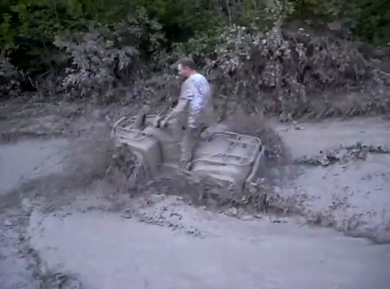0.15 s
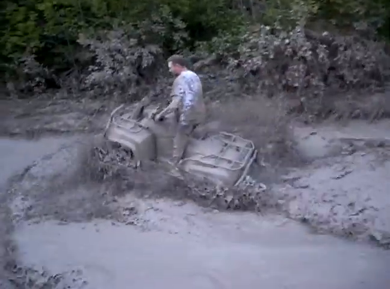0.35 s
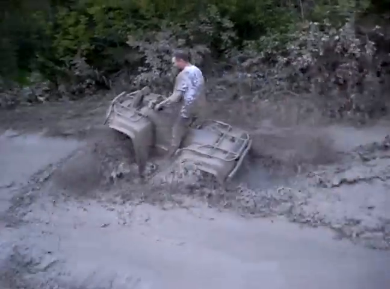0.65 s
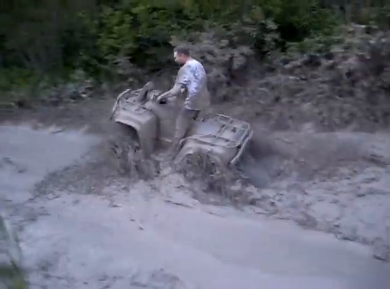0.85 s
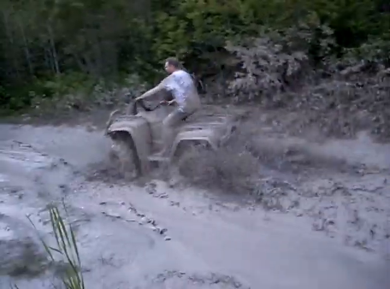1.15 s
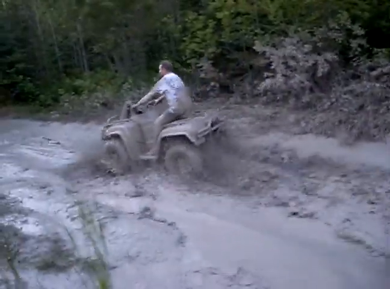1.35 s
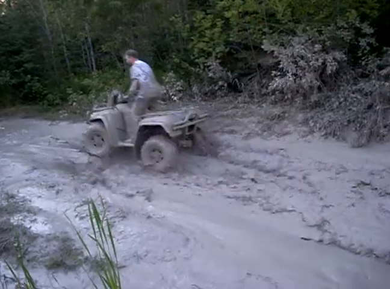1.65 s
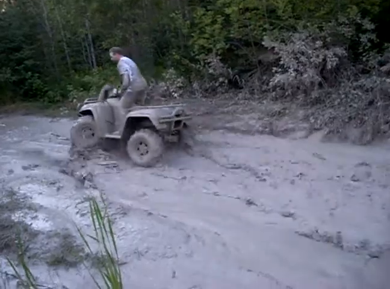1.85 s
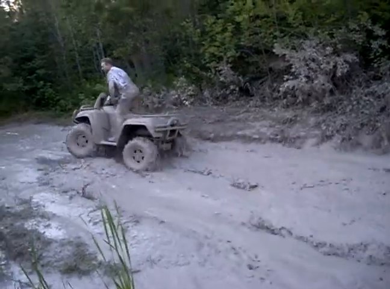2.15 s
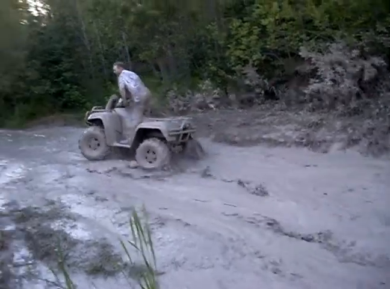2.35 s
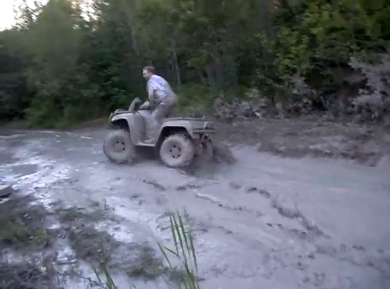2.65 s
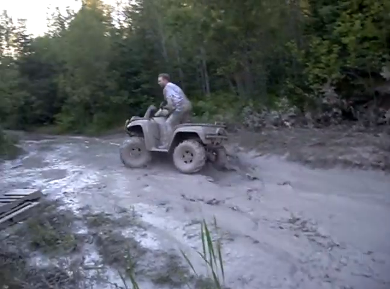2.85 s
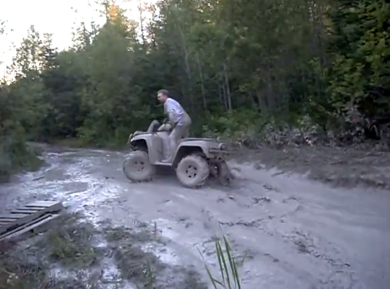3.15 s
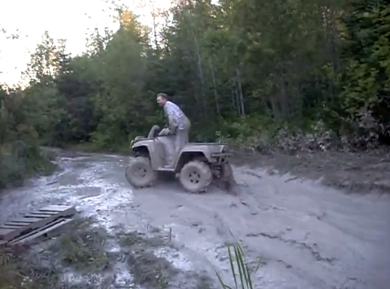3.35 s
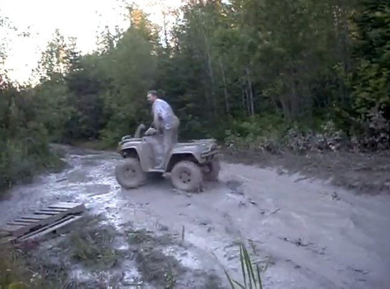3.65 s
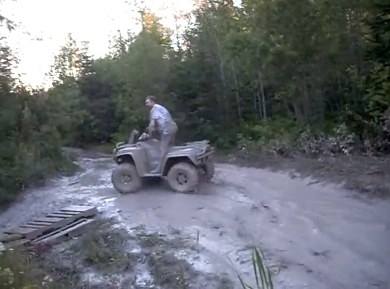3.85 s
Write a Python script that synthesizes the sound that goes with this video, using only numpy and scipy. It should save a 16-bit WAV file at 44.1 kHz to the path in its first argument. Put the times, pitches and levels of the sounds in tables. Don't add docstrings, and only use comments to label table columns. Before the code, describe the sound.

A loud raspy quad engine churns wet mud, cuts back abruptly, then putters and blips twice.

```python
import sys
import numpy as np
from scipy import signal
from scipy.io import wavfile
from scipy.ndimage import uniform_filter1d

SR = 44100
rng = np.random.default_rng(int(sys.argv[2]) if len(sys.argv) > 2 else 0)


def attenuation_scalar(level_db):
    decades = np.asarray(level_db, float) / 20
    return 10 ** decades


def transcribe(u):
    v = np.clip(np.atleast_2d(u).T, -1, 1)
    q = np.round(v * 32767).astype(np.int16)
    wavfile.write(sys.argv[1], SR, q)


N = 176400

# (time [s], firing rate [Hz])
ENGINE_SPEED = [(0.0, 48.2), (0.15, 48.85), (0.4, 45.15), (0.6, 47.2), (0.87, 49.05), (0.94, 42.5),
                (1.04, 35), (1.22, 25), (1.8, 18.5), (1.93, 19.5), (2.1, 27.6), (2.29, 32.3), (2.6, 30.3),
                (2.84, 22), (3.2, 23.5), (3.64, 30.9), (3.76, 30), (4.0, 23.3)]
# (time [s], pipe hum [dB], exhaust blast [dB])
ENGINE_LOAD = [(0, -28, -20.5), (.18, -29.5, -19), (.33, -28, -23), (.49, -27.5, -25.5), (.57, -28, -18),
               (.86, -32, -17.5), (.91, -41, -44), (1.08, -36, -39), (1.3, -50.5, -39.5), (1.8, -62, -46.5),
               (1.95, -43, -44), (2.25, -37, -42.5), (2.6, -42, -53), (2.87, -51.5, -58), (3.1, -48.5, -56),
               (3.3, -40, -43.5), (3.72, -41, -47.5), (3.85, -48, -89)]
# (frequency [Hz], level [dB])
PIPE_IN_SLURRY = [(48, -38), (95, -12.5), (145, -11.5), (190, -14.5), (240, -15.5), (285, -15.5),
                  (330, -20), (600, -27.5)]
PIPE_CLEAR = [(30, -36), (70, -19), (117, -4), (165, -17), (200, -4), (224, 2), (256, -2), (290, -9),
              (330, -22), (600, -34)]
# (time [s], resonance [Hz])
AIR_POCKET = [(0, 152), (.17, 160), (.26, 187), (.5, 184), (.56, 236), (.86, 243), (.9, 168), (1.0, 150),
              (1.05, 100), (1.3, 72)]
# (phase [turn], level [dB])
GAS_PUFFS = [(.14, 1), (.3, -6), (.43, 0), (.59, -2), (.77, -9)]
# (frequency [Hz], density [dB per Hz])
BLAST_COLOUR = [(240, -11), (400, -12.5), (677, -5), (1210, -37), (1520, -3), (3740, -3.5), (5810, -2.5),
                (10300, -5.5), (12000, 10), (15600, -49), (22000, -120)]
# (frequency [Hz], width [Hz], level [dB])
MUFFLER_TIN = [(1650, 260, -8), (2570, 200, 0.5), (3320, 490, -3), (4500, 340, -2), (5220, 200, -3),
               (5960, 250, -5.5)]
# (frequency [Hz], width [Hz], level [dB])
CRACK_TIN = [(1670, 230, -17), (2450, 160, -2), (3330, 130, -10)]
# (frequency [Hz], width [Hz], level [dB])
WET_RASP = [(652, 78, 7), (933, 110, -2.5)]
DRY_RASP = [(790, 90, -3), (890, 100, 0)]
HOT_RASP = [(800, 90, -4), (970, 110, 0)]
# (time [s], level [dB])
MUD_LEVEL = [(0, -27.5), (.5, -27), (.85, -26.5), (1.0, -29.5), (1.6, -32.5), (1.8, -36), (2.3, -33.5),
             (2.9, -38), (3.5, -39), (4, -41.5)]
# (frequency [Hz], density [dB per Hz])
WASH_COLOUR = [(25, -25), (110, -2), (170, -5.5), (380, -8), (540, -7.5), (800, 0), (1500, -4), (4000, -10),
               (11000, -18.5)]
# (time [s], firing rate [Hz])
FAR_SPEED = [(0, 18.7), (3.0, 18.7), (3.3, 19.5), (4, 19.6)]
# (frequency [Hz], width [Hz], level [dB])
FAR_PIPE = [(103.6, 19, 18), (203, 21, -3)]
# (time [s], turning rate [Hz], level [dB])
BELT = [(0, 30, -80), (.74, 30, -70), (.8, 35, -42), (.9, 43, -38), (.97, 41, -38), (1.02, 37, -70),
        (4, 37, -90)]
# (multiple of turning rate, level [dB])
BELT_ORDERS = [(2, -8), (3, -1), (4, 1.5), (5, -2)]
# (time [s], peak [dB])
SHARP_POPS = [(1.7382, -23), (1.7707, -22), (1.85, -25), (1.9039, -24), (1.9533, -20), (1.9977, -20),
              (2.0391, -23), (2.0924, -19), (2.1284, -19), (2.1643, -18), (2.2067, -21), (2.2291, -23),
              (2.2621, -20), (2.2925, -19), (2.3553, -24), (2.4182, -25), (2.4556, -24), (2.518, -25),
              (2.6332, -24), (2.6861, -24), (2.727, -27), (2.7604, -28), (2.7918, -25), (2.8452, -26),
              (2.9545, -28), (3.0079, -27), (3.0627, -27), (3.1076, -27), (3.1944, -27), (3.2708, -27),
              (3.3082, -26), (3.3481, -25), (3.4224, -27), (3.4583, -27), (3.5287, -25), (3.5811, -27),
              (3.6289, -25), (3.6718, -28), (3.7322, -25), (3.7826, -28), (3.8335, -29), (3.8739, -30),
              (3.9323, -27), (3.9547, -27)]
# (frequency [Hz], density [dB per Hz])
POP_RUSH_COLOUR = [(500, -25), (1000, -1), (1300, -7), (2600, 1.5), (4500, -6), (8000, -9.5), (12000, -9.5)]
# (delay [s], level [dB])
REFLECTIONS = [(.031, -14), (.074, -17), (.13, -20)]


def rms_one(x):
    return x / np.sqrt(np.mean(x ** 2) + 1e-20)


def evened(x):
    return x / np.sqrt(uniform_filter1d(x ** 2, size=6000) + 1e-20)


def in_time(rows):
    s, *columns = np.transpose(rows)
    return [np.interp(np.arange(N) / SR, s, column) for column in columns]


def drift(rate_hz):
    r = np.exp(-2 * np.pi * rate_hz * 40 / SR)
    white = rng.standard_normal(N // 40 + 2002)
    slow = signal.lfilter([1], [1, -2 * r, r * r], white)[2000:]
    return np.interp(np.arange(N) / 40, np.arange(len(slow)), rms_one(slow))


def filtered(x, order, hz, kind):
    return signal.sosfilt(signal.butter(order, hz, kind, fs=SR, output="sos"), x)


def decaying(x, fall_s):
    return signal.lfilter([1], [1, -np.exp(-1 / (fall_s * SR))], x + 1e-18)


def resonate(x, peaks):
    out = 0
    for k, (hz, width, db) in enumerate(peaks):
        r = np.exp(-np.pi * width / SR)
        feedback = [1, -2 * r * np.cos(2 * np.pi * hz / SR), r * r]
        ring = signal.lfilter([(1 - r * r) / 2, 0, (r * r - 1) / 2], feedback, x + 1e-18)
        out = out + (-1) ** k * attenuation_scalar(db) * ring
    return out


def banded_noise(spectrum, patchy_db):
    out = 0
    edges = 35 * 2 ** np.arange(0, 8.7, 1 / 3)
    white = rng.standard_normal((2, N))
    hz, db = np.transpose(spectrum)
    for k, (low, high) in enumerate(zip(edges, edges[1:])):
        band = filtered(white[k % 2], 2, [low, high], "band")
        level_db = np.interp(np.log(low * high) / 2, np.log(hz), db)
        out = out + band * attenuation_scalar(level_db + patchy_db * drift(4.8))
    return rms_one(out)


def firings(rate, start):
    spread_db, jitter_s = 2.0, .0006
    turns = start + np.cumsum(rate) / SR
    at = np.flatnonzero(np.diff(np.floor(turns)))
    late, strength = rng.standard_normal((250, 2))[:len(at)].T
    at = np.clip(at + (late * jitter_s * SR).astype(int), 0, N - 1)
    clicks = np.zeros(N)
    clicks[at] = attenuation_scalar(spread_db * strength)
    return clicks


def puffs(clicks, fall_s):
    a = np.exp(-1 / (.001 * SR))
    return signal.lfilter([1 - a], [1, -a], decaying(clicks, fall_s))


def throttle():
    flywheel_s, clear_s, leaving_s = .06, 1.35, .3
    wet = np.clip((clear_s - np.arange(N) / SR) / leaving_s, 0, 1)
    rate = uniform_filter1d(in_time(ENGINE_SPEED)[0], size=int(flywheel_s * SR), mode="nearest")
    return [rate] + in_time(ENGINE_LOAD) + [wet]


def hum():
    pocket_db, fifth_db, pocket_width = 11, 8, .09
    rate, hum_db, _, wet = throttle()
    pocket, = in_time(AIR_POCKET)
    turns = np.cumsum(rate) / SR
    out = 0
    for k in range(1, 15):
        wet_db, dry_db = [np.interp(np.log(k * rate), np.log(hz), db)
                          for hz, db in (np.transpose(PIPE_IN_SLURRY), np.transpose(PIPE_CLEAR))]
        off = np.log(k * rate / pocket)
        wet_db = wet_db + pocket_db * np.exp(-(off / pocket_width) ** 2)
        wet_db = wet_db + fifth_db * np.exp(-((off - np.log(1.5)) / pocket_width) ** 2)
        waver_db = (wet * 1.5 + (1 - wet) * .8) * drift(3)
        flutter_db = wet * 1.8 * drift(9)
        level_db = wet * wet_db + (1 - wet) * dry_db + waver_db + flutter_db
        out = out + attenuation_scalar(level_db) * np.sin(2 * np.pi * (k * turns + k * k / 4))
    return attenuation_scalar(hum_db) * out


def exhaust():
    puff_fall_s, crack_fall_s, steady_blast = .004, .0012, .25
    muffler_db, muffler_follows, crack_db = -4.5, .5, -7
    wet_rasp_db, dry_rasp_db, rasp_pulse, rasp_follows = -6, -5, 1.2, .4
    rate, hum_db, blast_db, wet = throttle()
    valves = sum(attenuation_scalar(db) * firings(rate, -turn) for turn, db in GAS_PUFFS)
    gate = evened(puffs(valves, puff_fall_s)) + steady_blast
    colour = banded_noise(BLAST_COLOUR, patchy_db=2.0)
    white = rng.standard_normal(N)

    tin_db = muffler_db + muffler_follows * np.clip(blast_db - blast_db[0], -4, 4)
    blast = evened(colour * gate + attenuation_scalar(tin_db) * rms_one(resonate(white * gate, MUFFLER_TIN)))

    snap = puffs(valves * np.sqrt(valves), crack_fall_s)
    crack = evened(rms_one(colour * snap) + rms_one(resonate(white * snap, CRACK_TIN)))

    air = rng.standard_normal(N) * gate + rasp_pulse * evened(firings(rate, -GAS_PUFFS[0][0]))
    hot = np.clip((rate - 24) / 6, 0, 1)
    dry_rasp = sum(np.sqrt(share) * rms_one(resonate(resonate(air, pipe), pipe))
                   for share, pipe in ((1 - hot, DRY_RASP), (hot, HOT_RASP)))
    dry_db = dry_rasp_db + rasp_follows * (blast_db - hum_db)
    rasp = wet * attenuation_scalar(wet_rasp_db) * rms_one(resonate(air, WET_RASP)) + (1 - wet) * attenuation_scalar(dry_db) * dry_rasp
    return attenuation_scalar(hum_db) * rasp + attenuation_scalar(blast_db) * (blast + (1 - wet) * attenuation_scalar(crack_db) * crack)


def mud():
    splats_per_s, splat_db, splat_cycles, spread_db = 2800, -11, 7.1, 5
    level_db, = in_time(MUD_LEVEL)
    sizes = attenuation_scalar(spread_db * np.minimum(rng.exponential(1, N), 5)) * rng.choice([-1, 1], N)
    born = rng.random(N) < splats_per_s * attenuation_scalar(3 * drift(8)) / SR
    dealt = rng.integers(0, 16, N)
    splats = 0
    for k, hz in enumerate(np.geomspace(550, 6000, 16)):
        hits = sizes * born * (dealt == k)
        splats = splats + resonate(hits, [(hz, hz / splat_cycles, 0)]) / np.sqrt(hz)
    wash = banded_noise(WASH_COLOUR, patchy_db=1.0)
    return attenuation_scalar(level_db) * (wash + attenuation_scalar(splat_db) * rms_one(splats))


def idler():
    tick_db, tick_fall_s, thump_db = -52, .0025, -49
    fired = firings(in_time(FAR_SPEED)[0], start=.75)
    hiss = filtered(rng.standard_normal(N), 1, [1800, 9000], "band")
    ticks = rms_one(hiss * puffs(fired, tick_fall_s))
    thumps = rms_one(resonate(fired, FAR_PIPE))
    return attenuation_scalar(tick_db) * ticks + attenuation_scalar(thump_db) * thumps


def drive():
    rate, level_db = in_time(BELT)
    turns = np.cumsum(rate) / SR
    whine = sum(attenuation_scalar(db + 2 * drift(9.5)) * np.sin(2 * np.pi * k * turns) for k, db in BELT_ORDERS)
    return attenuation_scalar(level_db) * whine


def pops():
    front_db, front_fall_s, rush_db, rush_fall_s = -8.5, .0015, -11, .018
    s, db = np.transpose(SHARP_POPS)
    clicks = np.zeros(N)
    clicks[(s * SR).astype(int)] = attenuation_scalar(db)
    front = filtered(decaying(clicks, front_fall_s) * rng.standard_normal(N), 2, 1500, "high")
    rush = decaying(clicks, rush_fall_s) * banded_noise(POP_RUSH_COLOUR, patchy_db=2.0)
    return attenuation_scalar(front_db) * front + attenuation_scalar(rush_db) * rush


def scene():
    near = exhaust() + idler() + pops()
    dull = signal.lfilter([.4], [1, -.6], near)
    echoes = sum(attenuation_scalar(db) * np.pad(dull, (int(s * SR), 0))[:N] for s, db in REFLECTIONS)
    return (hum() + drive() + near + echoes + mud())[None]


def top_cut(x):
    return signal.sosfilt(signal.butter(12, 12390, fs=SR, output="sos"), x)


def record(dry):
    soft = filtered(dry, 6, 10100, "low")
    steep = signal.cheby2(12, 60, 12750, fs=SR, output="sos")
    return top_cut(signal.sosfilt(steep, soft))


dry = scene()
out = record(dry)
transcribe(out)
```